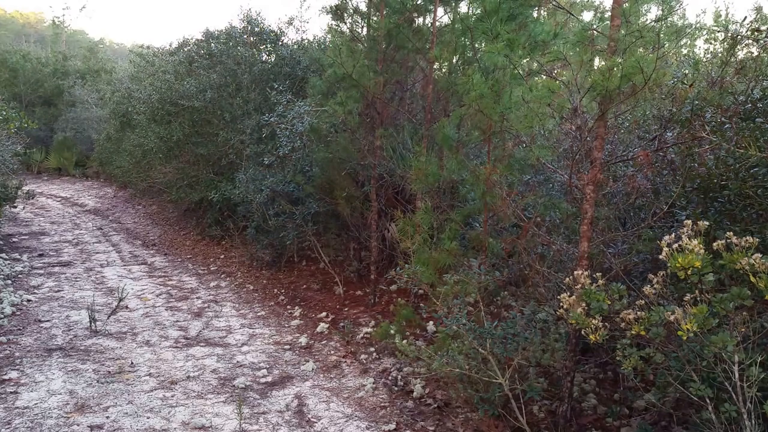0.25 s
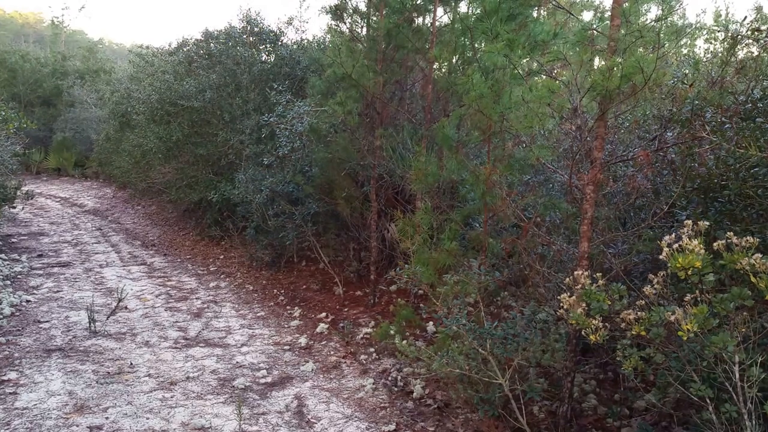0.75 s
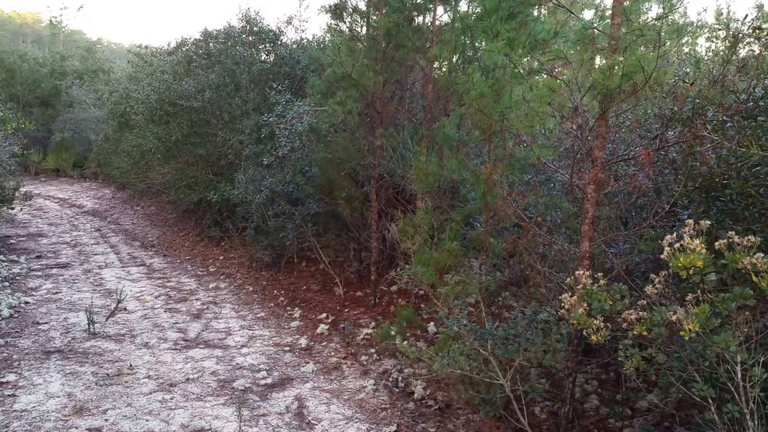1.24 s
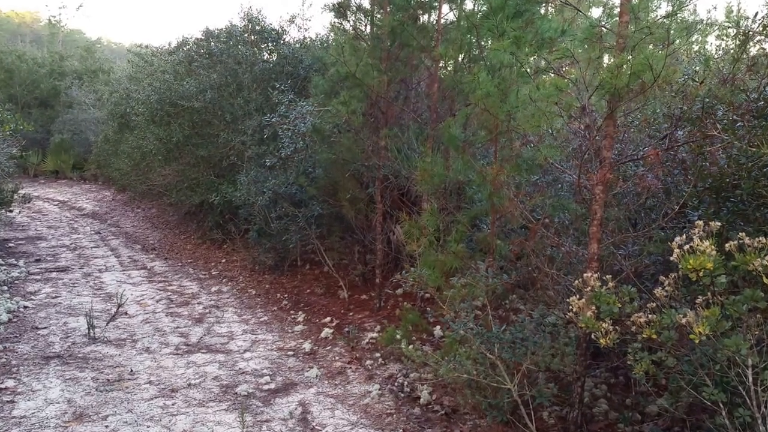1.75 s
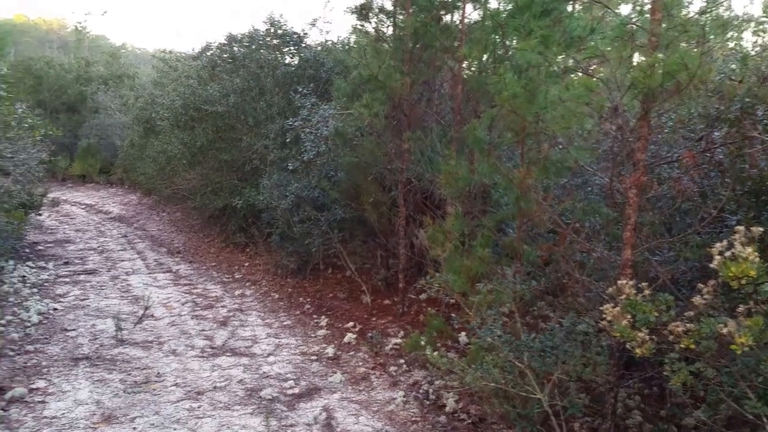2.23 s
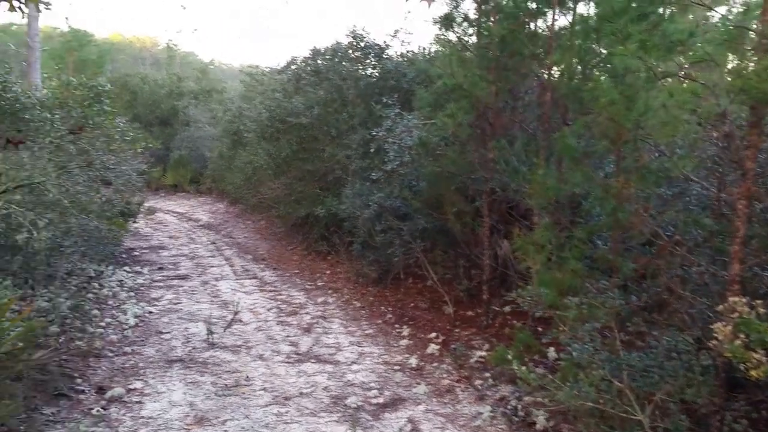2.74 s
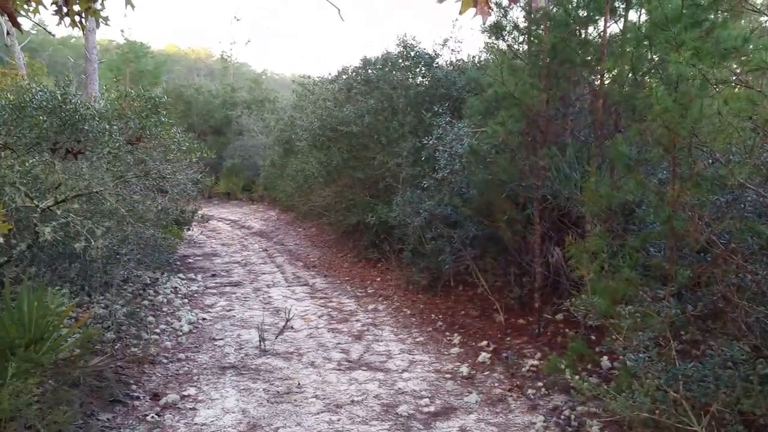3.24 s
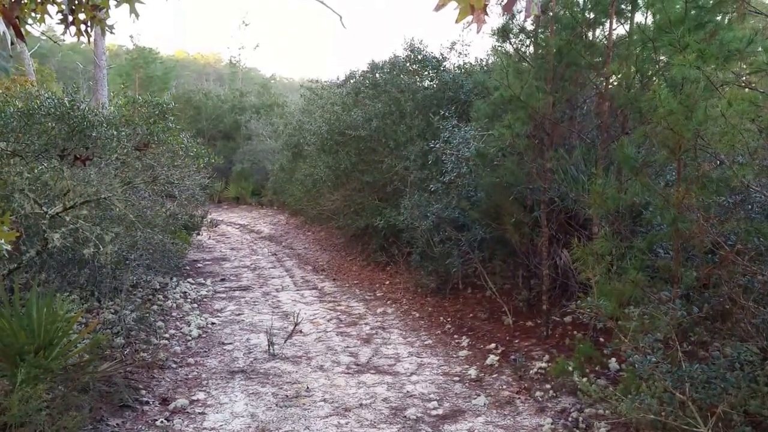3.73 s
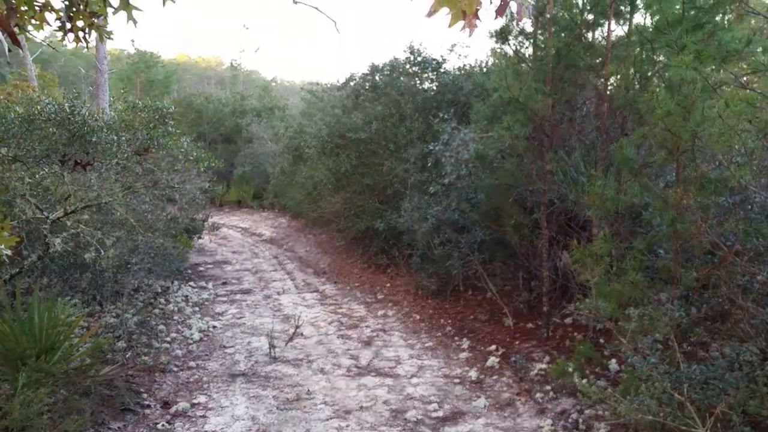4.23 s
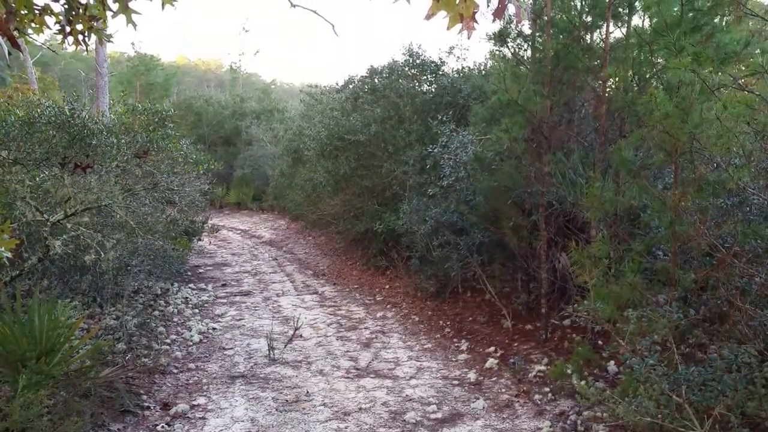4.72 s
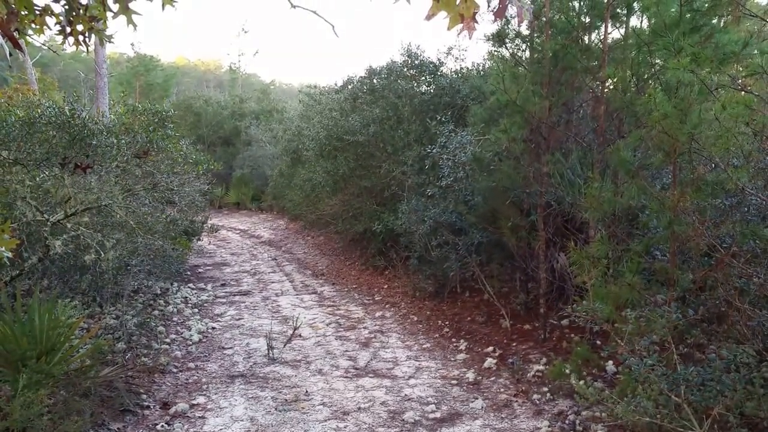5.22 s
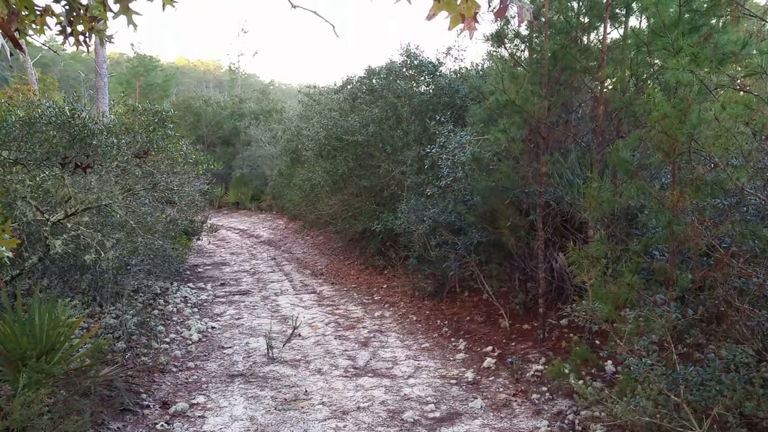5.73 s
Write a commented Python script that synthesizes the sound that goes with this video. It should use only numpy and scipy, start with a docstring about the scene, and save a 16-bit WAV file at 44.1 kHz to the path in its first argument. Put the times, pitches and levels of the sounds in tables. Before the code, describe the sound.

Hunting dogs bay some way off in scrub woodland: a long howl breaking upward, a low raspy howl, a pause, then clustered yelps.

```python
"""Dogs bay in scrub woodland some way off, over air and microphone hiss, a rumble and an insect chorus.
First the echo of a call just before fades, as noise in two bands; then a long howl breaks into a higher voice.
A yelp and a low, rasping howl follow; after a pause comes a last cluster of yelps and short bays.
The voices are harmonic stacks with throat-filtered rasps, scattered by the trees as decaying noise tails.
Among them fall arching sine whistles (two high, like a bird's; one faint), noise-burst ticks and leaf hiss."""
import sys
import numpy as np
from scipy import signal
from scipy.io import wavfile
from scipy.ndimage import uniform_filter1d

SR = 44100
rng = np.random.default_rng(int(sys.argv[2]) if len(sys.argv) > 2 else 0)


def bounce(signal):
    """Save signal as a 16-bit WAV file at the path given by the first command-line argument."""
    frames = np.transpose(np.atleast_2d(signal))
    limited = np.clip(frames, -1, 1)
    pcm = np.round(limited * 32767).astype(np.int16)
    wavfile.write(sys.argv[1], SR, pcm)


def level_to_linear(level):
    """Convert decibel levels to linear amplitude factors, elementwise."""
    exponent = np.asarray(level, float) / 20
    return 10 ** exponent


N = 263277

# Spectrum of the air and microphone hiss. Each row: frequency in Hz, relative level in dB per Hz.
AIR_SPECTRUM = [(15, -45), (27, -14), (55, -8), (86, -5), (126, -9.5), (275, -12), (785, -17.5),
                (3020, -23.5), (5610, -26), (7960, -35.5), (15600, -33)]
AIR_DB = -69   # rms before the swell
# Stereo image of the hiss. Each row: frequency in Hz, left-right likeness from -1 to 1, left over right in dB.
LIKENESS = [(30.2, -0.34, 4), (70.7, 0.99, 1), (197, 0.63, 1.5), (640, 0.11, 0), (1520, 0.063, -3.5),
            (2860, -0.43, 1), (6540, -0.016, 3.5), (15000, -0.061, 3)]
# Slow change of the background. Each row: time in seconds, rise of the hiss in dB, rumble level in dB rms.
SWELL = [(0, 1.5, -80.5), (1.4, 2.5, -80.5), (1.9, 7, -74), (3.501, 9.5, -66), (4.5, 3.5, -70.5),
         (5.4, 4, -74), (5.97, 7, -66)]
RUMBLE_HZ, RUMBLE_WIDTH_HZ = 94, 18
INSECT_HZ, INSECT_WIDTH_HZ, INSECT_DB = 5600, 1000, -77   # rms before swell and stereo lean
INSECTS_FOLLOW = 0.5   # share of the hiss's rise in dB

# Puffs of leaf hiss. Each row: start in seconds, end in seconds, level in dB rms before fading, centre in Hz.
RUSTLES = [(3.193, 3.392, -73.5, 11600), (3.353, 3.811, -76, 10520), (4.36, 4.528, -77, 7490)]
# Twig cracks. Each row: time in seconds, peak in dB, ring in Hz.
TICKS = [(1.5, -62, 9000), (2.364, -60, 7800), (2.609, -49, 3700), (2.716, -46, 8300), (2.717, -49, 4000),
         (4.685, -55, 2600), (5.032, -58, 13500), (5.036, -53, 8400), (5.255, -56, 2100)]
# Thin arching whistle tones: two high ones like a bird's, and a faint 3 kHz one over the howl.
# Each row: start in seconds, end in seconds, top pitch in Hz, top level in dB rms
# before flutter and stereo lean, fall of pitch at the ends in Hz.
WHISTLES = [(2.22, 2.62, 7290, -73, 190), (5.05, 5.42, 7170, -78, 190), (2.205, 2.375, 3070, -79, 360)]
WHISTLE_ARCH_DB = 12   # the ends are softer
EARLIER_DB, EARLIER_T60_S = -65.5, 3.9

# Scattering by the trees. Each row: frequency in Hz, 60 dB decay time in seconds, echo level in dB.
WOODS = [(503, 1.4, -12), (920, 0.58, -10.5), (1920, 1.06, -2.5), (2900, 0.66, 0), (4400, 0.22, -1)]
WOODS_BUILD_S, WOODS_CLUMP_DB, WOODS_STIR_PER_S = .015, 2.0, 14.0
FAR_DB, FAR_T60_S = -18, 3.65   # the far tree line rings on longer

# Throat resonances. Each row: frequency in Hz, width in Hz, relative level in dB,
# share of the mouth opening that is gained.
THROAT = [(605, 170, 3.5, -0.32), (857, 141, 5, 0.17), (1377, 204, -4.5, 0.64), (1980, 450, -17, 2.44),
          (3000, 1000, -34, 2.5)]
THROAT_CUT_HZ, THROAT_TOP_HZ = 516, 3700
THROAT_DARK_HZ = 1800   # also the top of the far tree line's echo
# Beating of the tone. Each row: start in seconds, beats per second, number of beats (rounded), depth 0-1.
THROBS = [(2.907, 33, 2.1, 0.61), (3.352, 39.7, 6.0, 0.59)]
# The vocal folds lose their beat. Each row: start in seconds, end in seconds, source level in dB,
# cycles to one strong slap, unevenness 0-1, mouth opening in dB.
RASPS = [ (1.661, 1.676, -50, 1.3, 0.74, 9), (1.859, 1.894, -47.5, 4.9, 0.34, 0),
         (2.441, 2.489, -39, 4.06, 0.3, -5.5), (2.666, 2.698, -43, 4.8, 0.31, -1.5),
         (2.769, 2.792, -39, 3.6, 0.29, -1.5), (3.324, 3.39, -35.5, 2.0, 0.32, 1),
         (3.388, 3.531, -44.5, 4.0, 0.5, -3), (3.55, 3.67, -41.5, 4.16, 0.4, -6.5),
         (3.663, 3.787, -40, 3.83, 0.31, -6), (3.79, 3.895, -41.5, 3.07, 0.58, -2),
         (3.894, 3.961, -41.5, 2.0, 0.17, -6.5), (5.488, 5.538, -39, 3.08, 0.6, 2),
         (5.54, 5.578, -36.5, 3.44, 0.3, -4), (5.658, 5.72, -38, 5.24, 0.1, -2),
         (5.711, 5.756, -43, 5.5, 0.02, -4), ]
SLAP_SPREAD_DB = 4   # slaps differ in size when fully uneven
HOARSE_WOBBLE = .03   # share of pitch that a fully uneven rasp adds to the tremble
RASP_DIMS_DB, DIMMED_ABOVE_HZ = -4.5, 1000   # a rasp drowns the clean overtones

# Unbroken stretches of voice, one list each. Each row: time in seconds, pitch in Hz,
# effort in dB rms before the harmonic's other gains, mouth opening in dB.
BAYS = [
    [(1.382, 482, -66.5, 4), (1.392, 502, -66, -15), (1.415, 543, -74, 1.5)],
    [(1.66, 640, -55.5, 23), (1.675, 823, -40.5, 21), (1.69, 786.4, -32, 14), (1.715, 724, -27, 13),
     (1.735, 635, -29.5, 14), (1.755, 533.3, -42.5, 22), (1.81, 570.6, -37, 4), (1.85, 547.2, -47.5, 5),
     (1.95, 553, -41, 5), (2.0, 527.7, -46.5, 19.5), (2.09, 551.5, -40.5, 10.5), (2.22, 556, -43, 2),
     (2.43, 550, -40.5, 6), (2.46, 610.5, -37.5, -15), (2.495, 550.7, -42, 10.5), (2.65, 571, -39.5, -1),
     (2.678, 607.7, -35, 2), (2.74, 556.3, -38.5, 0), (2.788, 631.8, -37.5, 0)],
    [(2.79, 887, -38, 2), (2.91, 871.3, -35, -3), (2.958, 859, -26.5, -4), (2.98, 923, -41.5, 0),
     (2.995, 1039, -47, 1.5)],
    [(3.27, 2410, -45, -5), (3.279, 1950, -43.5, 0), (3.29, 1734, -41.5, 2), (3.3, 1757, -54, 2),
     (3.31, 1440, -50.5, 10), (3.319, 1310, -44, 12)],
    [(3.325, 434.7, -40, -17), (3.358, 423, -32.5, -23), (3.42, 434.8, -39.5, 16),
     (3.453, 425.4, -35.5, 15), (3.51, 433, -36.5, 15), (3.53, 424.7, -47.5, 19), (3.66, 411.6, -43, -21),
     (3.79, 403.4, -41.5, -7), (3.81, 396.9, -37, -12), (3.845, 396.8, -36, -23), (3.872, 392.7, -46, -10),
     (3.89, 388, -36, -21), (3.95, 377.3, -40, -40), (3.965, 378, -72, -7)],
    [(5.428, 640, -55, 29), (5.436, 776, -47.5, 9), (5.444, 855, -41, -11), (5.455, 855, -32.5, -8),
     (5.462, 760, -47, -14), (5.48, 670, -54, -11)],
    [(5.456, 1093, -39, -4.5), (5.47, 1140, -51.5, 2), (5.488, 1006, -47, 5.5), (5.54, 977, -26, -30),
     (5.555, 910, -49, -4)],
    [(5.49, 708, -52, 23.5), (5.512, 723.7, -31, 3), (5.528, 644, -57, 0), (5.545, 640, -34, -11),
     (5.572, 581.5, -38, -3), (5.586, 522, -43.5, 12), (5.635, 534, -40.5, 0.5), (5.662, 605, -31.5, -0.5),
     (5.7, 595, -36.5, -2), (5.745, 585, -32.5, -12), (5.765, 531, -41.5, -5), (5.795, 514, -47, -1),
     (5.802, 525, -61, 2)],
    [(5.798, 880, -46.5, 1), (5.815, 860, -61, -1), (5.835, 770, -62, -3)],
]
# Voice and place of each stretch. Each row: 1st, 2nd, 3rd and 4th harmonic in dB, left over right in dB,
# delay of the left port in samples.
VOICES = [(-1, 5, 5, -11, -5.5, 3.2), (1, -26, -35.5, -47.5, -3, 5.4), (-2, -30.5, -42.5, -53, 1, 4),
          (-1, -24, -28.5, -31, -5, 9.7), (-20.5, 0, -7, -39, -1.5, 6.65), (0, -6, -36, -50, -1.5, 5.4),
          (-0.5, -6.5, -21.5, -25, 0.5, 6.9), (-1, -13, -21.5, -45.5, -3, 3.6), (3, -32, -28, -37, 5, 5.5)]
# Lift by the open mouth. Each row: frequency in Hz, share of the mouth opening that is gained.
MOUTH_LIFT = [(860, 0.1), (1100, 0.74), (1300, 0.19), (1650, 1.01), (2100, 1.27), (2600, 1.08)]
ONSET_S = 0.0041


def rms_one(x):
    """Normalization: scale to unit root-mean-square."""
    return x / np.sqrt(np.mean(x ** 2) + 1e-20)


def at_hz(points, hz, order=1):
    """Interpolation on a log-frequency axis: read one column of a table."""
    return np.interp(np.log(hz), np.log(np.array(points)[:, 0]), np.array(points)[:, order])


def drift(rate_hz, size=N):
    """Low-passed noise: a slow random course of unit rms."""
    r = np.exp(-2 * np.pi * rate_hz / SR)
    slow = signal.lfilter([1], [1, -2 * r, r * r], rng.standard_normal(size + SR))
    return rms_one(slow[SR:])   # the filter's start is discarded


def resonance(x, hz, width_hz):
    """Damped oscillator: a two-pole resonance whose gain is 1 at its peak."""
    r = np.exp(-np.pi * width_hz / SR)
    poles = [1, -2 * r * np.cos(2 * np.pi * hz / SR), r * r]
    return signal.lfilter([(1 - r * r) / 2, 0, (r * r - 1) / 2], poles, x)


def band_pass(low_hz, high_hz):
    """Band limitation: a Butterworth band-pass."""
    return signal.butter(2, [low_hz, high_hz], "band", fs=SR, output="sos")


def bands(low_hz, count):
    """Filter bank: half-octave band-passes with their centres."""
    edges = low_hz * 2 ** (np.arange(count + 1) / 2)
    return [(np.sqrt(a * b), band_pass(a, b)) for a, b in zip(edges, edges[1:])]


def stretch(rows, fade_s):
    """Piecewise-linear control: sample times, columns and a softly edged gate of one table."""
    s, *columns = np.transpose(rows)
    at = np.arange(int(s[0] * SR), min(int(s[-1] * SR), N))
    edge = np.clip(np.minimum(at - at[0], at[-1] - at) / (fade_s * SR), 0, 1)
    return at, [np.interp(at / SR, s, c) for c in columns], np.sin(edge * np.pi / 2) ** 2


def placed(x, pan_db, lag):
    """Stereo localization: level and arrival time (in samples) differ between two microphone ports."""
    n = np.arange(N)
    left = level_to_linear(pan_db / 2) * np.interp(n - lag / 2, n, x)
    right = level_to_linear(-pan_db / 2) * np.interp(n + lag / 2, n, x)
    return np.array([left, right])


def swell():
    """Slow modulation: the hiss's rise and the rumble's level, in dB along time."""
    s, *columns = np.transpose(SWELL)
    return [np.interp(np.arange(N) / SR, s, c) for c in columns]


def air_hiss(rise_db):
    """Partly coherent noise: mid and side noise in each band set the likeness of the ports."""
    white, air = rng.standard_normal((2, 2, N)), 0
    for k, (hz, sos) in enumerate(bands(23.67, count=19)):
        mid, side = signal.sosfilt(sos, white[k % 2])   # adjacent bands use separate noise
        alike = np.clip(at_hz(LIKENESS, hz), -1, 1)
        lean_db = at_hz(LIKENESS, hz, order=2) * np.array([[.5], [-.5]])
        stereo = np.sqrt(1 + alike) * mid + np.sqrt(1 - alike) * side * [[1], [-1]]
        air = air + level_to_linear(at_hz(AIR_SPECTRUM, hz) + lean_db) * stereo
    return level_to_linear(AIR_DB + rise_db) * rms_one(air)


def distant_rumble(level_db):
    """Resonant low noise: one narrow band, the same at both ports."""
    return level_to_linear(level_db) * rms_one(resonance(rng.standard_normal(N), RUMBLE_HZ, RUMBLE_WIDTH_HZ))


def insect_chorus(rise_db):
    """Statistical blending: the chorus merges into noise through two equal resonances."""
    chorus = rng.standard_normal((2, N))
    for _ in range(2):
        chorus = resonance(chorus, INSECT_HZ, INSECT_WIDTH_HZ)
    level_db = INSECT_DB + INSECTS_FOLLOW * rise_db + np.array([[2.5], [-2.5]])   # leans left
    return level_to_linear(level_db) * rms_one(chorus)


def background():
    """Superposition: hiss, rumble and insects add."""
    rise_db, rumble_db = swell()
    return air_hiss(rise_db) + distant_rumble(rumble_db) + insect_chorus(rise_db)


def rustles():
    """Band-limited friction noise: leaves make soft puffs of narrow hiss."""
    out = np.zeros((2, N))
    for start, end, level_db, hz in RUSTLES:
        at = np.arange(int(start * SR), int(end * SR))
        hiss = rng.standard_normal((2, len(at)))
        for _ in range(2):
            hiss = resonance(hiss, hz, 0.14 * hz)
        out[:, at] += level_to_linear(level_db) * np.hanning(len(at)) ** .5 * rms_one(hiss)
    return out


def ticks():
    """Impulsive excitation: a twig's short crack, broad around its pitch, with a brief ring."""
    out, t = np.zeros((2, N)), np.arange(SR // 20) / SR
    for s, peak_db, hz in TICKS:
        crack = rng.standard_normal(len(t)) * (np.exp(-t / .0012) + .14 * np.exp(-t / .02))
        broad = signal.sosfilt(band_pass(.3 * hz, min(1.8 * hz, .45 * SR)), crack)
        snap = broad + 8 * resonance(crack, hz, .04 * hz)
        out[:, int(s * SR):int(s * SR) + len(t)] += level_to_linear(peak_db) * snap / np.abs(snap).max()
    return out


def whistles():
    """Frequency and amplitude modulation: a thin, trembling sine arches in pitch and level."""
    out = np.zeros(N)
    for start, end, hz, level_db, drop_hz in WHISTLES:
        arch = [(start, 1), (.6 * start + .4 * end, 0), (end, 1)]   # 0 at the top, 1 at the ends
        at, (low,), gate = stretch(arch, fade_s=ONSET_S)
        level = level_to_linear(level_db - WHISTLE_ARCH_DB * low + 3.6 * drift(37, size=len(at)))
        phase = 2 * np.pi * np.cumsum(hz - drop_hz * low ** 2) / SR
        out[at] += np.sqrt(2) * gate * level * np.sin(phase)
    return placed(out, pan_db=4, lag=0)


def earlier_bay():
    """Exponential decay: the fading echo of a call just before, noise in two bands near 770 and 1330 Hz."""
    level = level_to_linear(EARLIER_DB - 60 * np.arange(N) / SR / EARLIER_T60_S)
    white = rng.standard_normal((2, N))
    return level * rms_one(resonance(white, 768, 83) + 0.45 * resonance(white, 1330, 160))


def woods(x):
    """Multiple scattering: noise tails of trunks and leaves build up, then die band by band."""
    t, tail = np.arange(int(1.6 * SR)) / SR, 0
    clumps = level_to_linear(WOODS_CLUMP_DB * drift(27, size=len(t)))
    shape = (1 - np.exp(-(t / WOODS_BUILD_S) ** 2)) * clumps
    for hz, sos in bands(317.4, count=9):
        near = level_to_linear(-60 * t / at_hz(WOODS, hz))
        far = level_to_linear(FAR_DB - 60 * t / FAR_T60_S) * (hz < THROAT_DARK_HZ)
        dying = shape * (near + far)
        gain = level_to_linear(at_hz(WOODS, hz, order=2)) / np.sqrt(np.sum(dying ** 2))
        tail = tail + gain * dying * signal.sosfilt(sos, rng.standard_normal((2, 2, len(t))))
    one, other = (signal.fftconvolve(x, path, axes=1)[:, :N] for path in tail)
    # stirring leaves keep shifting the echo between two paths
    turn = 1.4 * np.array([drift(WOODS_STIR_PER_S), drift(WOODS_STIR_PER_S)]) + np.pi / 4
    return np.cos(turn) * one + np.sin(turn) * other


def throat(x, open_db):
    """Formant filtering: parallel resonances, the first three low-passed, weighted by mouth opening."""
    rings = []
    for k, (hz, width_hz, db, share) in enumerate(THROAT):
        rings.append((-1) ** k * level_to_linear(db + open_db * share) * resonance(x + 1e-18, hz, width_hz))
    dark = signal.butter(4, THROAT_DARK_HZ, fs=SR, output="sos")
    rung = signal.sosfilt(dark, sum(rings[:3])) + sum(rings[3:])
    # makes up for the power the resonances take from white noise at zero opening
    rung = rung * np.sqrt(SR / (np.pi * sum(width_hz * level_to_linear(2 * db) for _, width_hz, db, _ in THROAT)))
    limits = signal.butter(6, [THROAT_CUT_HZ, THROAT_TOP_HZ], "band", fs=SR, output="sos")
    return signal.sosfilt(limits, rung)


def throb():
    """Amplitude beating: the tone is full at the start and end of each throb."""
    t, gain = np.arange(N) / SR, np.ones(N)
    for start, per_s, beats, depth in THROBS:
        turns = np.clip(per_s * (t - start), 0, round(beats))
        gain -= np.clip(depth, 0, 1) * np.sin(np.pi * turns) ** 2
    return gain


def rasp(at, pitch):
    """Subharmonic fold vibration: uneven slaps every few cycles, and breath they gate, ring the throat."""
    out = np.zeros(N)
    for start, end, level_db, cycles, uneven, open_db in RASPS:
        inside = (at >= start * SR) & (at < end * SR)
        if not at[0] < (start + end) / 2 * SR < at[-1]:
            continue
        uneven = np.clip(uneven, 0, 1)
        source = np.zeros(inside.sum() + SR // 20)   # room for the ring
        jitter = 1 + .15 * uneven * drift(60, size=inside.sum())
        beat = 1 + np.cumsum(pitch[inside] / cycles * jitter) / SR
        size = len(beat)
        # one impulse per beat, scaled to unit power
        slaps = np.diff(np.floor(beat), prepend=0) * np.sqrt(SR * cycles / pitch[inside])
        slaps = slaps * level_to_linear(SLAP_SPREAD_DB * np.sqrt(uneven) * np.minimum(rng.standard_normal(size), 1))
        breath = rng.standard_normal(size) * 2 * (1 - beat % 1) ** 2
        flutter_db = 4.0 * uneven * drift(50, size=size).clip(-2, 1.2)
        strength = level_to_linear(level_db + flutter_db) * signal.windows.tukey(size + 40, .06)[40:]
        source[:size] = strength * (np.sqrt(1 - uneven) * slaps + .5 * np.sqrt(uneven) * breath)
        first = at[inside][0]
        out[first:first + len(source)] += throat(source, open_db)
    return out


def dogs():
    """Harmonic synthesis: each stretch is a near-pure stack with a slight tremble, plus its rasp."""
    out, beating = np.zeros((2, N)), throb()
    for rows, (*voice_db, pan_db, lag) in zip(BAYS, VOICES):
        at, (pitch, effort_db, open_db), gate = stretch(rows, fade_s=ONSET_S)
        spans = [((at > s * SR) * (at < end * SR), uneven) for s, end, _, _, uneven, _ in RASPS]
        hoarse = sum(span * uneven for span, uneven in spans).clip(0, 1)
        rasping = uniform_filter1d(sum(span * 1. for span, _ in spans).clip(0, 1), size=300)
        tremble = (0.0057 + HOARSE_WOBBLE * hoarse) * drift(34, size=len(at))
        phase = 2 * np.pi * np.cumsum(pitch * (1 + tremble)) / SR
        voice = rasp(at, pitch)
        for k, share_db in enumerate(voice_db):
            hz = (k + 1) * pitch
            level_db = effort_db + share_db + open_db * at_hz(MOUTH_LIFT, hz)
            level_db = level_db + RASP_DIMS_DB * rasping * (hz > DIMMED_ABOVE_HZ) * (k > 0)
            waver_db = .55 * (k + 1) * drift(25, size=len(at))   # higher harmonics waver more
            level = level_to_linear(level_db + waver_db)
            voice[at] += np.sqrt(2) * gate * beating[at] * level * np.sin((k + 1) * phase)
        out += placed(voice, pan_db, lag)
    return out


def scene():
    """Superposition: direct voices and their echo add to the quiet wood."""
    pack = dogs()
    return background() + rustles() + ticks() + whistles() + earlier_bay() + woods(pack) + pack


def top_cut(x):
    """Nothing passes above the cut-off."""
    return signal.sosfilt(signal.butter(12, 15740, fs=SR, output="sos"), x)


def record(dry):
    """Signal chain: the finished mix passes to its last stage."""
    return top_cut(dry)


dry = scene()
out = record(dry)
bounce(out)
```